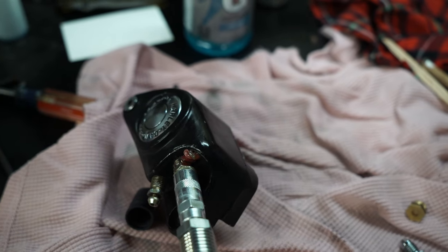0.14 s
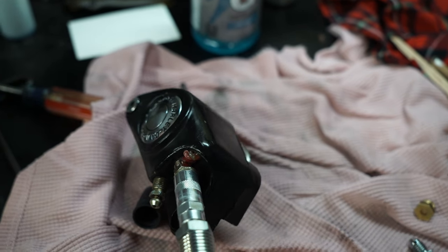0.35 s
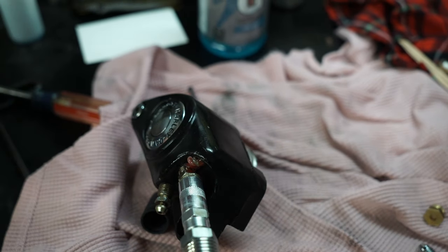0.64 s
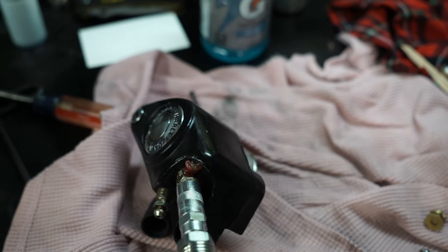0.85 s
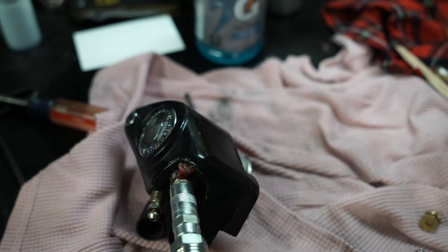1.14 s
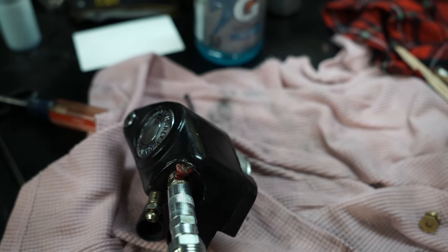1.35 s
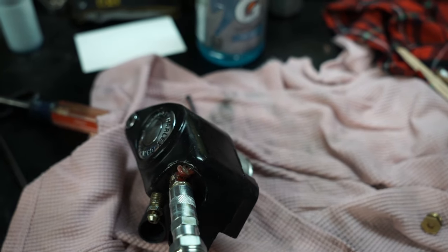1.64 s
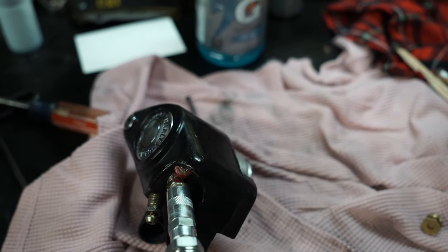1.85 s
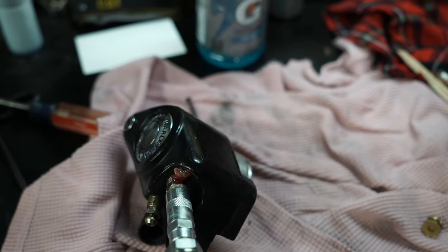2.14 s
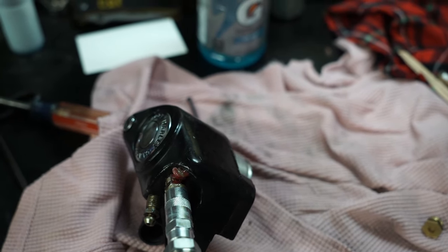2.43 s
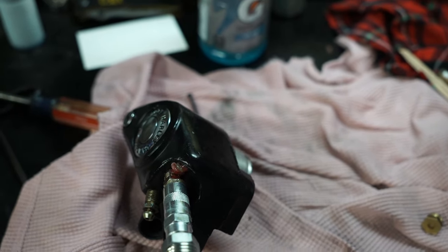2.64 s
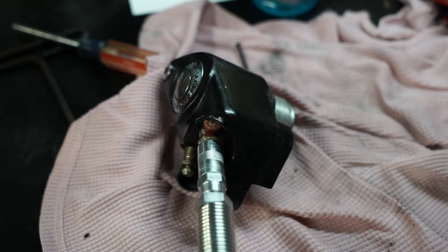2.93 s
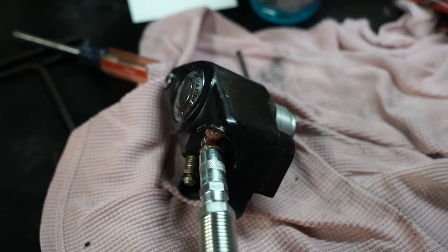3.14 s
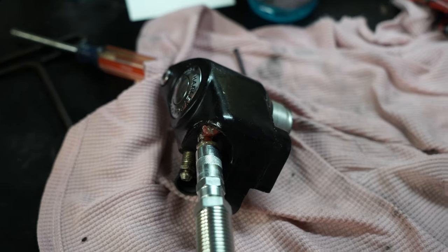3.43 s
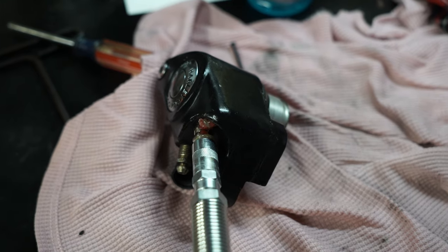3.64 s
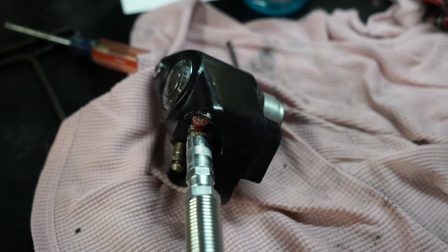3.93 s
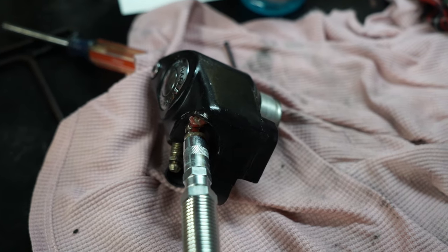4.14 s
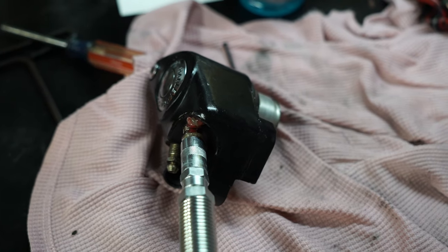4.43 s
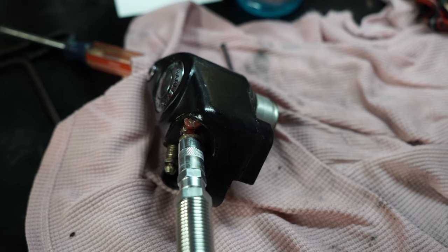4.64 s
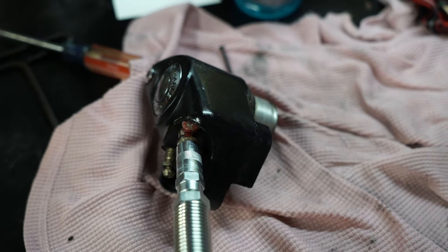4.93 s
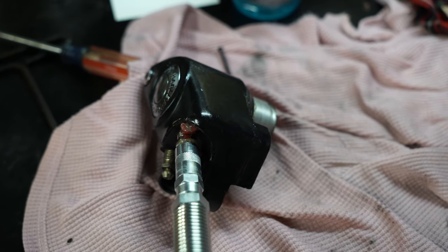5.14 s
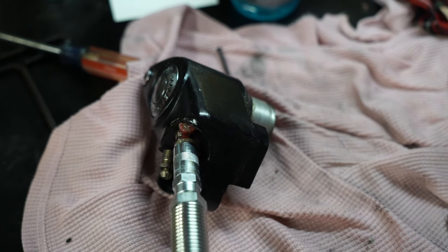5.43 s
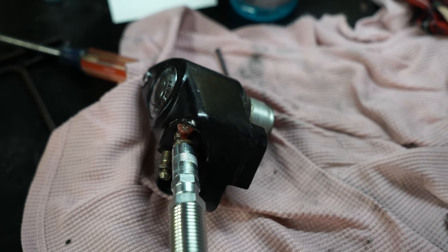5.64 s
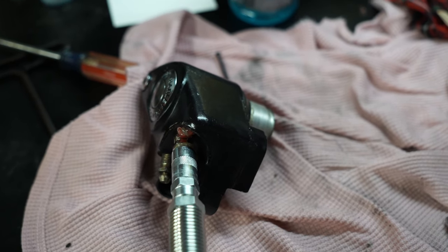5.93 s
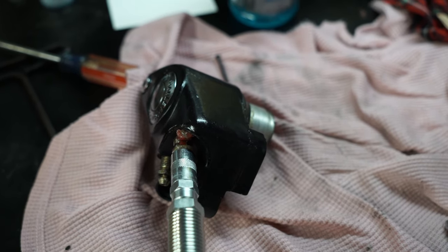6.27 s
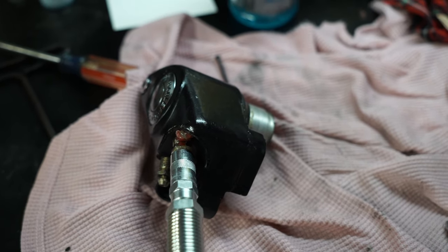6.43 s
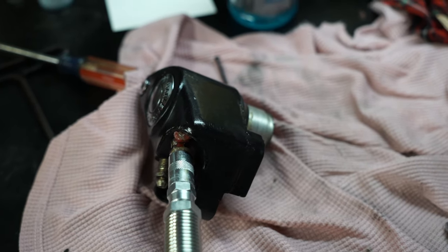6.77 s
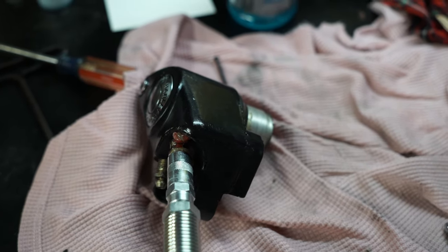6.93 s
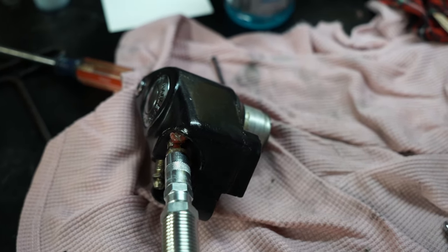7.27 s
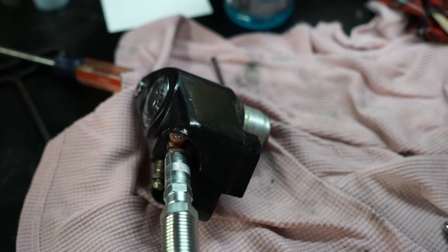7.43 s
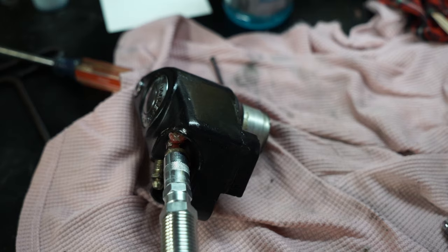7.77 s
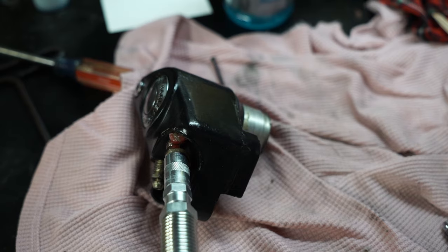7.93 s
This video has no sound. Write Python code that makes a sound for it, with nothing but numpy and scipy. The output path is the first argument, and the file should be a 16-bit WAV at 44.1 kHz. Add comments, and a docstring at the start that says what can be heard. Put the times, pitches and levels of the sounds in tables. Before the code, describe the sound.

A battery grease gun pumps about twice a second with a high whine and grinding gears, pausing briefly once.

```python
"""Cordless grease gun on a workbench.

The gun pumps grease into a brake part, pauses for half a second and runs on. Switched current makes
the motor windings whine, the brushes hiss, and slack gear teeth rattle the housing. Twice a second
the piston pushes: the motor slows under the torque and the loaded teeth grind and sing.
Faint clicks, squeaks and a rub of the grip fill the pause; bench and walls reflect the gun's sound."""
import sys
import numpy as np
from scipy import signal
from scipy.fft import rfft, irfft, next_fast_len
from scipy.io import wavfile

SR = 44100
rng = np.random.default_rng(int(sys.argv[2]) if len(sys.argv) > 2 else 0)


def int16_out(signal):
    """Quantize to a 16-bit WAV file."""
    q = np.round(np.clip(np.atleast_2d(signal).T, -1, 1) * 32767)
    wavfile.write(sys.argv[1], SR, q.astype(np.int16))


N = 357210
TIME = np.arange(N) / SR

# Resonances of the gear housing: (frequency [Hz], bandwidth [Hz], lift over the broad response [dB])
HOUSING_MODES = [(1330, 110, 3), (1650, 140, 1.5), (1740, 81, 4.5), (2124, 88, -4), (2238, 72, 10),
                 (2497, 146, 11), (3323, 84, 6), (3470, 50, 3), (3460, 41, 2.5), (3660, 120, 0.5),
                 (5150, 300, 4.5), (7550, 84, -1)]
# Pulls of the trigger: (press [s], release [s], first piston push [s], extra length of first cycle [s])
TRIGGER_PULLS = [(-1, 2.693, .203, 0), (3.267, 9, 3.793, .028)]
FREE_SPEED_HZ = 188.2  # shaft speed approached without load
START_DELAY_S = 0.033  # from a press until the motor breaks free


def amp(db):
    """Amplitude ratio of a level in decibels."""
    return 10 ** (np.asarray(db) / 20)


def unit(x):
    """Normalisation to an rms of 1."""
    return x / np.sqrt(np.mean(x ** 2) + 1e-20)


def bump(t, width):
    """Gaussian pulse of height 1 around t = 0."""
    return np.exp(-(t / width) ** 2)


def curve(rows, hz, column=1):
    """Interpolation of a table column over log frequency."""
    table = np.transpose(rows)
    return np.interp(np.log(hz + 1), np.log(table[0] + 1), table[column])


def wander(hz):
    """Random modulation: low-passed noise of rms 1."""
    spectrum = rfft(rng.standard_normal(N))
    return unit(irfft(spectrum / (1 + (np.fft.rfftfreq(N, 1 / SR) / hz) ** 4), N))


def resonances(modes, hz):
    """Modal response in dB, as a sum of Lorentzian peaks and dips."""
    return sum(peak / (1 + (2 * (hz - f) / width) ** 2) for f, width, peak in modes)


def body(x, spectrum, modes=(), size=4096):
    """Minimum-phase filtering by a structure: broad response plus modes, with power gain 1."""
    hz = np.fft.rfftfreq(size, 1 / SR)
    db = curve(spectrum, hz) + resonances(modes, hz)
    log_gain = np.log(amp(np.r_[db, db[-2:0:-1]]))
    ring = np.fft.ifft(np.exp(np.conj(signal.hilbert(log_gain)))).real
    return signal.oaconvolve(x, ring[None] / np.linalg.norm(ring), axes=1)[:, :N]


def impacts(per_s, spread_db):
    """Shot noise: a Poisson train of uneven blows, as two faces of the gun radiate it."""
    sizes = rng.standard_normal((2, N)) * amp(spread_db * rng.standard_normal(N))
    return unit(sizes * (rng.random(N) < per_s / SR))


def throb(cycles, depth):
    """Amplitude modulation with one swell a cycle."""
    return unit(np.exp(depth * np.cos(2 * np.pi * cycles)))


def cohere(reference, independent, coherence):
    """Partial coherence: a power-preserving mix of a reference and an independent spectrum."""
    return coherence * reference + np.sqrt(1 - coherence ** 2) * independent


def background(air_db=-60, rub_db=-61, coherent_below_hz=900):
    """Room noise and friction of the grip in the pause, coherent only in the bass as in a diffuse field."""
    # Spectrum of the quiet shop: (frequency [Hz], relative level [dB])
    air_spectrum = [(25, -22), (70, -10), (170, -9), (340, -2), (600, -7), (850, -10), (1150, -7),
                    (2500, -13), (7000, -17.5), (10000, -21), (16000, -22.5)]
    # Spectrum of the shifting grip: (frequency [Hz], relative level [dB])
    rub_spectrum = [(20, -8), (45, 2), (80, 1), (130, 0), (330, 2), (600, -6), (1500, -21), (4000, -13),
                    (6600, -16), (9000, -19), (16000, -32)]
    air = amp(air_db) * body(rng.standard_normal((2, N)), air_spectrum)
    shift = amp(rub_db + 1.5 * wander(14)) * bump(TIME - 2.98, 0.25)
    rub = shift * body(rng.standard_normal((2, N)), rub_spectrum)
    other, right = rfft(air + rub)
    coherence = 1 / (1 + (np.fft.rfftfreq(N, 1 / SR) / coherent_below_hz) ** 4)
    return irfft(np.array([cohere(right, other, coherence), right]), N)


def reflections(t60s):
    """Reverberation: sparse echoes of random sign, decaying exponentially in each band."""
    taps = rng.choice([-1., 1.], SR // 2) * (rng.random(SR // 2) < 3000 / SR)
    hz, t, bands = signal.stft(taps, SR, nperseg=256)
    tail = signal.istft(bands * amp(-60 * t / curve(t60s, hz)[:, None]), SR, nperseg=256)[1]
    return np.r_[np.zeros(100), tail / np.linalg.norm(tail)]


def workshop(x, room_db=-10, bench_db=-13, bench_t60=0.02, coherent_below_hz=750, bass_hz=650):
    """Superposition of bench and wall reflections on the direct sound, which dominates in the bass."""
    # Reverberation of the shop: (frequency [Hz], T60 [s])
    room_decay = [(200, 1), (1800, 0.33), (6000, 0.16), (14000, 0.19)]
    size = next_fast_len(N + SR)
    hz = np.fft.rfftfreq(size, 1 / SR)
    echoes = [amp(room_db) * reflections(room_decay) + amp(bench_db) * reflections([(1, bench_t60)])
              for _ in range(2)]
    other, right = rfft(echoes, size)
    left = cohere(right, other, 1 / (1 + (hz / coherent_below_hz) ** 4))
    highpass = hz / np.hypot(hz, bass_hz)
    return irfft((1 + highpass * np.array([left, right])) * rfft(x, size), size)[:, :N]


def microphones(faces):
    """Level and phase differences place the gun to the right; coherence is greatest in the bass."""
    # Microphone pair: (frequency [Hz], left minus right level [dB], coherence [0-1])
    pair = [(50, 0.5, .92), (130, -3.5, 0.98), (450, -1, 1), (740, 0, 0.94), (1260, -5, 0.64),
            (2160, -5, 0.33), (2650, -8.5, 0), (3370, -6, 0.6), (4350, -1, 0.99), (6070, -2.5, 0.34),
            (9550, -5, 0.32), (11800, -3, 0.05), (14000, -8, .45)]
    # Lag of the left channel: (frequency [Hz], phase [rad])
    left_lag = [(2100, 0), (2800, 2.6), (4000, 3.2), (5000, 4.8), (6500, 6.1), (16000, 6.1)]
    hz = np.fft.rfftfreq(N, 1 / SR)
    other, right = rfft(faces)
    left = cohere(right, other, curve(pair, hz, column=2))
    left *= amp(curve(pair, hz)) * np.exp(-1j * curve(left_lag, hz))
    return irfft(np.array([left, right]), N)


def squeaks():
    """Friction at the greasy coupler gives thin, unsteady slip tones in the pause."""
    # Slips: (time [s], half-width [s], pitch [Hz], glide [Hz/s], level [dB])
    slips = [(3.033, 0.056, 6650, 5005, -64), (3.045, .018, 3420, 4, -61),
             (3.145, 0.029, 6600, -14000, -67), (3.21, 0.022, 4400, -16000, -67)]
    out = np.zeros(N)
    for at, width, hz, glide, db in slips:
        pitch = hz + glide * np.clip(TIME - at, -2 * width, 2 * width) + 160 * wander(300)
        out += amp(db) * bump(TIME - at, width) * np.sin(2 * np.pi * np.cumsum(pitch) / SR)
    return out


def clicks():
    """Light impacts of trigger and coupler: exponentially damped bursts of band noise."""
    # Contacts: (time [s], peak level [dB], band frequency [Hz], T60 [s])
    contacts = [(3.061, -45, 1300, 0.095), (3.094, -43, 6300, 0.04), (3.095, -45, 1620, 0.062),
                (3.267, -36, 3300, 0.04)]
    out, t = np.zeros(N), np.arange(4000) / SR
    for at, db, hz, t60 in contacts:
        band = signal.butter(1, [hz * 0.77, hz * 1.1], "band", fs=SR)
        tick = signal.lfilter(*band, rng.standard_normal(len(t))) * amp(-60 * t / t60)
        out[round(at * SR):][:len(t)] += amp(db) * tick / abs(tick).max()
    return out


def trigger(delay_s, rise_s, fall_s, coast_share=0, coast_s=0.23):
    """Envelope of the pulls: linear attack, exponential release, and a share that coasts to rest."""
    out = np.zeros(N)
    for pressed, released, *_ in TRIGGER_PULLS:
        after = np.maximum(TIME - released, 0)
        braking = (1 - coast_share) * np.exp(-after / fall_s)
        coasting = coast_share * np.maximum(1 - after / coast_s, 0)
        out += np.clip((TIME - pressed - delay_s) / rise_s, 0, 1) * (braking + coasting)
    return out


def since_push(cycle_s=0.4774):
    """Seconds since the piston last began to push, a periodic motion while the trigger is held."""
    since = TIME + cycle_s - TRIGGER_PULLS[0][2]
    for _, released, first, extra in TRIGGER_PULLS:
        for at in [first, *np.arange(first + extra + cycle_s, released, cycle_s)]:
            since = np.where(TIME >= at, TIME - at, since)
    return since


def piston(push_s=0.176, skew=0.65, bite_s=0.0067):
    """Cyclic loading: each push is an early-peaking arch of torque, which the teeth quickly take up."""
    since = since_push()
    torque = abs(np.sin(np.pi * np.minimum(since / push_s, 1) ** skew))
    load = np.sqrt(torque) * np.minimum(since / bite_s, 1)
    return torque, load


def shaft_speed(torque, start_hz=150, inertia_s=0.209, stall_share=0.838):
    """Rotor inertia: the speed follows the motor's linear torque-speed law with a first-order lag."""
    powered = sum((TIME > pressed + START_DELAY_S) & (TIME < released)
                  for pressed, released, *_ in TRIGGER_PULLS)
    target = FREE_SPEED_HZ * (powered - stall_share * torque)
    pole = np.exp(-1 / (inertia_s * SR))
    speed = signal.lfilter([1 - pole], [1, -pole], target, zi=[start_hz])[0]
    return np.maximum(speed, 0) * (1 + 0.00298 * wander(11.9))


def run_up(db, length_s):
    """Starting transient: extra gain while the motor strains to gather speed."""
    strain = sum((TIME > pressed) * bump(TIME - pressed, length_s) for pressed, *_ in TRIGGER_PULLS)
    return amp(db * strain)


def hose_recoil(delay_s=0.25, hz=78, width_s=0.032, db=-57):
    """Elastic recoil: the hose thumps softly as the piston lets go."""
    return amp(db) * bump(since_push() - delay_s, width_s) * np.sin(2 * np.pi * (hz * TIME + rng.random()))


def jolt(at_s=3.327, width_s=0.021, db=-34):
    """Reaction to the starting torque jerks the gun in the hand."""
    # Response of the hand-held gun: (frequency [Hz], relative level [dB])
    spectrum = [(100, -26), (240, -8), (340, 4), (520, 1), (750, 8), (1300, -13), (3000, -34)]
    return amp(db) * body(bump(TIME - at_s, width_s) * rng.standard_normal((2, N)), spectrum)


def motor_shake(turns, speed, load, hum_db=-48, shake_db=-42.5, load_db=-4):
    """Forced vibration: the rotor hums and shakes the gun, less when load removes the gears' play."""
    # Response to the shaking: (frequency [Hz], relative level [dB])
    spectrum = [(30, -22), (80, -15), (120, -15), (160, -5), (205, -6), (255, 1), (300, -1), (380, 1),
                (520, 2), (630, -1), (700, 4), (850, -2), (1300, -10), (4000, -40)]
    pace = speed / speed.max()
    hum = amp(hum_db) * pace ** 8 * (1 + 0.4 * wander(25)) * np.sin(2 * np.pi * turns)
    shake = amp(shake_db) * pace * body(impacts(per_s=3500, spread_db=1), spectrum)
    return (hum + shake) * amp(load_db * load)


def brush_hiss(turns, speed, load, return_stroke, db=-28):
    """Shot noise of the sparking brushes grows with the motor's speed and work."""
    # Spectrum of the brushes: (frequency [Hz], relative level [dB])
    spectrum = [(1000, -23.5), (4000, 0.5), (7000, 3), (10000, 2), (13000, 0.5), (15600, 1.5)]
    work = speed / FREE_SPEED_HZ * amp(3 * np.sqrt(load) + 2.5 * return_stroke)
    sparks = impacts(per_s=22000, spread_db=3.4) * throb(turns, depth=0.058) * amp(0.38 * wander(45))
    return amp(db) * work * run_up(db=3.5, length_s=0.76) * body(sparks, spectrum)


def controller_whine(load, switching_hz=3908.6, load_db=-3):
    """Magnetic forces of the switched current make the windings whine, a little less under load."""
    # Whine at each microphone as the gun is held: (time [s], left level [dB], right level [dB])
    levels = [(0, -41, -24), (2.65, -32.5, -24), (3.35, -23, -15.5), (3.8, -32, -17), (4.2, -46, -20.5),
              (6, -43, -23.5), (8.1, -38, -23)]
    # Harmonics: (multiple of the switching frequency, relative level [dB])
    harmonics = [(1, -0.5), (2, -33), (3, -34.5), (4, -38)]
    times, left_db, right_db = np.transpose(levels)
    current = trigger(delay_s=0, rise_s=0.063, fall_s=0.014) * amp(load_db * load)
    channels = []
    for db, lead_rad in ((left_db, 1.6), (right_db, 0)):
        phase = 2 * np.pi * switching_hz * TIME + lead_rad + 0.15 * wander(25.1)
        tone = sum(amp(part_db) * np.sin(round(k) * phase) for k, part_db in harmonics)
        gain = amp(np.interp(TIME, times, db) + 1.1 * wander(18))
        channels.append(np.sqrt(2) * tone * current * gain)
    return np.array(channels)


def gear_tones(turns, speed, load, cutoff_hz=6200):
    """Tooth-mesh harmonics swell as they cross housing modes; one stage sings free, the other loaded."""
    # Mesh orders: (multiple of the shaft speed, free-running level [dB], loaded level [dB])
    orders = [(12, -26.5, -60), (13, -60, -30), (26, -47, -27), (30, -47, -60), (39, -70, -34),
              (52, -70, -36)]
    # Radiation dips of the loaded stage: (frequency [Hz], bandwidth [Hz], gain [dB])
    dips = [(2020, 240, -11), (4450, 600, -5)]
    free = (speed / speed.max()) ** 12 * np.clip(1 - load, 0, 1)
    twist = turns + 0.0036 * wander(110)  # play in the train smears the high tones
    out = np.zeros(N)
    for order, free_db, load_db in orders:
        hz = round(order) * speed
        radiation = amp(resonances(HOUSING_MODES, hz)) / np.sqrt(1 + (hz / cutoff_hz) ** 12)
        force = free * amp(free_db) + load ** 0.7 * amp(load_db + resonances(dips, hz))
        force *= 1 + 0.4 * wander(70)
        out += np.sqrt(2) * radiation * force * np.sin(2 * np.pi * round(order) * twist)
    return out


def gear_grind(turns, load, db=-19):
    """Sliding friction of loaded teeth, modulated at the mesh rate, excites the strained pump head."""
    # Spectrum of the grinding: (frequency [Hz], relative level [dB])
    spectrum = [(500, -34), (1500, -4.5), (2800, 4.5), (4500, 5.5), (5600, -1.5), (7500, -3.5),
                (10300, -8.5), (11300, -25), (16000, -41.5)]
    # Resonances of the pump head: (frequency [Hz], bandwidth [Hz], lift [dB])
    head_modes = [(3680, 120, 9.5), (4780, 200, -1.5), (6750, 160, 4), (8870, 440, 3), (9300, 150, 6),
                  (10400, 160, 8)]
    scrape = impacts(per_s=30000, spread_db=0.5) * throb(13 * turns, depth=0.35)
    return amp(db) * body(load * scrape, spectrum, head_modes)


def backlash(load, return_stroke, clash_s=0.018):
    """Gain of the rattle: load holds the teeth taut; they clash as a push takes hold and lets go."""
    since = since_push()
    clash_db = 4.5 * bump(since - 0.0065, clash_s) + 1.5 * bump(since - 0.142, clash_s)
    return amp(-1.5 * load + clash_db + 2.5 * return_stroke)


def knocks(random_per_s=2.7, decay_s=0.0027, gain_db=5):
    """Backlash impacts: slack teeth slap shut with a short scrape, at set times and lightly at random."""
    # Knocks of the gear teeth at set times: (time [s], relative level [dB])
    timed_knocks = [(3.9483, -19), (5.6535, -7), (6.337, -11), (6.394, -24), (6.6757, -3)]
    blows, t = np.zeros((2, N)), np.arange(500) / SR
    random_knocks = [(at, -19 + rng.standard_normal()) for at in TIME[rng.random(N) < random_per_s / SR]]
    for at, db in timed_knocks + random_knocks:
        scrape = rng.standard_normal((2, len(t))) * np.exp(-t / decay_s)
        scrape *= np.sqrt(2) / np.linalg.norm(scrape)
        span = blows[:, round(at * SR):][:, :len(t)]
        span += amp(db + gain_db) * scrape[:, :span.shape[1]]
    return blows


def gear_chatter(drive, slack, db=-30.5):
    """Sparse, heavy impacts of slack teeth ring the main housing mode in short bursts."""
    # Band around that mode: (frequency [Hz], relative level [dB])
    spectrum = [(1500, -36.5), (2150, -9), (2450, -0.5), (2620, 0.5), (3000, -37.5)]
    blows = (drive * slack) ** 2 * impacts(per_s=320, spread_db=0)
    return amp(db) * body(blows, spectrum, HOUSING_MODES)


def gear_rattle(turns, drive, slack, teeth_db=-21.5):
    """Impact excitation: dense tooth collisions and single knocks ring the modes of the housing."""
    # Broad response of the housing: (frequency [Hz], relative level [dB])
    spectrum = [(100, -75), (600, -23.5), (720, -15.5), (860, -22.5), (1000, -7), (1250, -2.5), (2000, -1),
                (2800, -3), (3700, 1), (4400, -5), (5200, -11), (6500, -15.5), (10000, -22.5),
                (16000, -24.5)]
    teeth = impacts(per_s=9000, spread_db=1.1) * throb(turns, depth=0.18) * amp(0.8 * wander(30))
    teeth *= amp(teeth_db) * slack * run_up(db=2.9, length_s=0.78)
    return body(drive * (teeth + knocks()), spectrum, HOUSING_MODES)


def gun(torque, load):
    """Common modulation: one shaft and one piston cycle govern the noises and tones of the mechanism."""
    drive = trigger(START_DELAY_S, rise_s=0.05, fall_s=0.014, coast_share=0.096)
    speed = shaft_speed(torque)
    turns = np.cumsum(speed) / SR
    return_stroke = bump(since_push() - 0.28, 0.064)
    slack = backlash(load, return_stroke)
    gears = gear_rattle(turns, drive, slack) + gear_chatter(drive, slack) + drive * gear_grind(turns, load)
    motor = brush_hiss(turns, speed, load, return_stroke) + motor_shake(turns, speed, load)
    tones = amp([[-5], [0]]) * gear_tones(turns, speed, load)  # weaker on the left
    return microphones(gears + drive * motor + jolt()) + drive * (tones + hose_recoil())


def scene():
    """Superposition of the gun with its reflections, the direct whine and the background."""
    torque, load = piston()
    return workshop(gun(torque, load) + clicks() + squeaks()) + controller_whine(load) + background()


def record(dry):
    """Band limiting by a linear-phase low-pass filter."""
    cutoff_hz = 15800
    lowpass = signal.firwin(701, cutoff_hz, window=("kaiser", 9), fs=SR)
    return signal.oaconvolve(dry, lowpass[None], "same")


dry = scene()
out = record(dry)
int16_out(out)
```